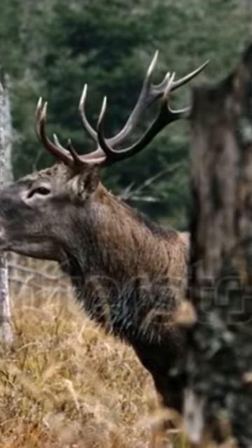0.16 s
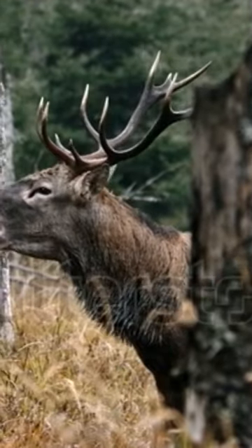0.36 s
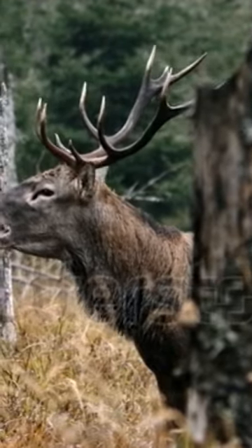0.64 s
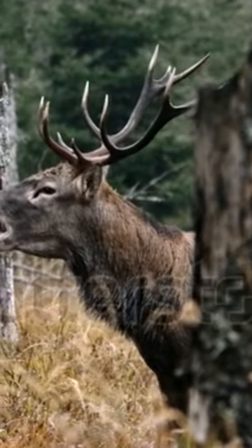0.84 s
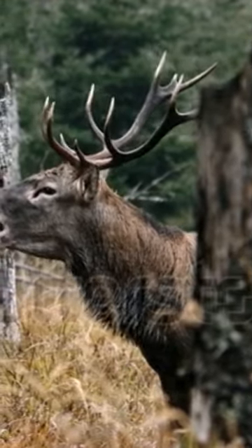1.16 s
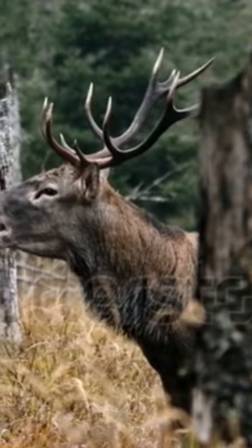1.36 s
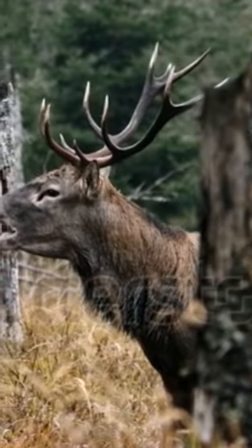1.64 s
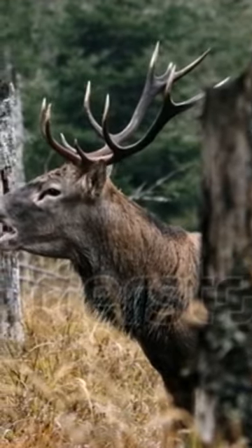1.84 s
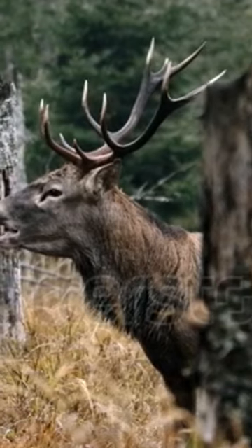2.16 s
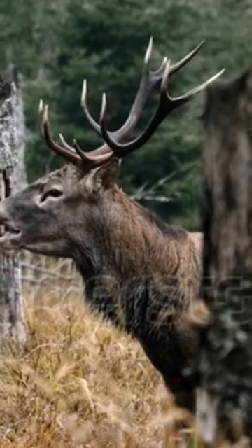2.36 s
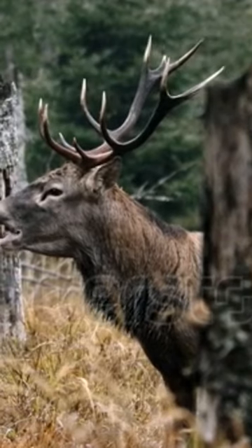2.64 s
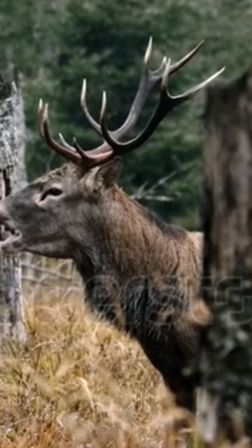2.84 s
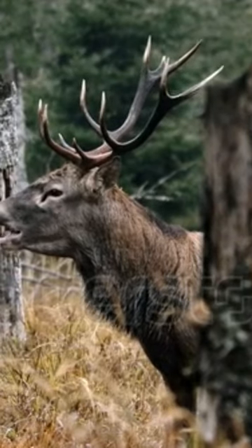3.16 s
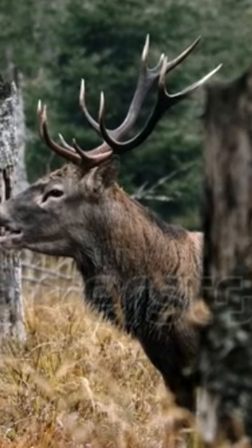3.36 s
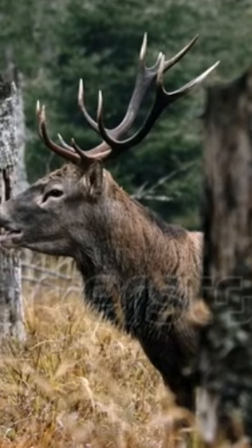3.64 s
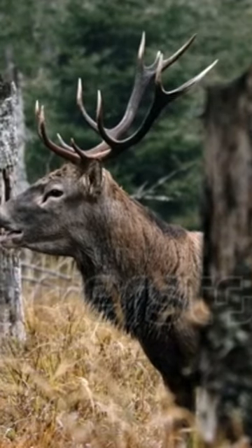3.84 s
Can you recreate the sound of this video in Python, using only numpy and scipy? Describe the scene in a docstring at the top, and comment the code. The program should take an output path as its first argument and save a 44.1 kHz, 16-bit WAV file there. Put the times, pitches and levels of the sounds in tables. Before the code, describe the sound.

Low, rattling deer roar, then a breathy puff and a short grunt over light wind.

```python
"""A red deer stag's roar, ending over a light rumble of wind in quiet woodland. Slow, separate slaps of
the vocal folds ring his long throat, which lengthens as he calls; the roar collapses into a chuff of air.
He puffs once. Two dry ticks, two soft bass bumps and a small bird's chirp follow, then his short, dry,
rattling grunt and a last chuff. Trees return a dull echo."""
import sys
import numpy as np
from scipy import signal
from scipy.fft import rfft, irfft
from scipy.io import wavfile
from scipy.ndimage import uniform_filter1d

SR = 44100
rng = np.random.default_rng(int(sys.argv[2]) if len(sys.argv) > 2 else 0)


def wav_record(signal):
    """Record a signal, one row per channel, as 16-bit PCM in the file named by sys.argv[1]."""
    frames = np.transpose(np.atleast_2d(signal))
    bounded = np.clip(frames, -1, 1)
    # unit amplitude maps onto the largest positive 16-bit level
    quanta = np.round(bounded * 32767).astype(np.int16)
    wavfile.write(sys.argv[1], SR, quanta)


N = 176400
HZ = np.fft.rfftfreq(8192, 1 / SR)

# roar, fold rate: time_s, slaps_per_s
ROAR_SLAP_RATE = [(.0126, 29.21), (.07, 31.29), (.17, 26.78), (.3, 36.09), (.41, 40.55), (.5, 41.25),
                  (.61, 25.75)]
# roar, effort: time_s, relative_db, tuning_ratio, tilt_db_per_octave
ROAR_EFFORT = [(0, -18, 1.083, 0.5), (.19, -18.5, 1.037, 1), (.35, -16.5, 1.005, -0.1), (.46, -17, .99, 1),
               (.54, -16, .972, -1), (.6, -24, .96, -3)]
# roar, throat resonances before tuning: centre_hz, width_hz, relative_db
ROAR_MODES = [(327.5, 10, -16), (441.7, 18, -3), (554, 17, 3.5), (910, 14, -4), (1060, 104, -16),
              (1267, 19, -4.5), (1502, 16, -6), (1878, 35, -5.5), (1963, 36, -6), (2294, 47, -10.5),
              (2704, 83, -12.5), (2900, 39, -11.5), (3187, 34, -11.5), (3510, 97, -19), (3970, 174, -19.5),
              (5160, 46, -25.5), (6160, 47, -37), (6950, 53, -40), (7500, 59, -36)]
# roar, nasal side-branch dips before tuning: centre_hz, width_hz, depth_db
NASAL_DIPS = [(1690, 72, 14.5), (2498, 45, 38), (4620, 147, 18)]
# roar, broad colour: freq_hz, gain_db
ROAR_EQ = [(30, -16), (160, -0.5), (400, 0.5), (4200, -3), (5500, -1), (8000, -5), (11000, -17),
           (16000, -34)]
# wind and forest hiss spectrum: freq_hz, relative_db
WIND_SPECTRUM = [(10, -19), (22, -0.5), (40, 2.5), (75, -0.5), (110, -10.5), (180, -16), (300, -14.5),
                 (420, -15.5), (620, -24.5), (800, -21), (1100, -29), (2000, -32.5), (2550, -29),
                 (3100, -36), (5000, -40), (15000, -44.5)]
# woodland reverberation: freq_hz, t60_s
WOODS_DECAY = [(100, 0.33), (500, 1.8), (1500, 1.92), (3000, 1.7), (10000, .4)]
# chuffs as the throat relaxes: start_s, length_s, level_db, first_hz, last_hz
CHUFF_SWEEPS = [(0.56, .056, -23.5, 477.7, 60), (3.429, .05, -36.5, 398.3, 69.6)]
# puffs of air: start_s, rise_s, fade_60db_s, level_db, tilt_db_per_octave
PUFF_BURSTS = [(.565, .028, .07, -26, -.5), (.612, .016, .075, -28, 0), (1.381, .004, .075, -32.5, 0),
               (1.408, .02, .1, -38, -.5), (3.434, .008, .07, -38, -3), (3.462, .016, .11, -42, -2)]
# puffs, open-mouth resonances before tuning: centre_hz, width_hz, relative_db
MOUTH_MODES = [(382, 180, 1), (698, 113, 1), (1100, 300, -4.5), (1640, 130, -3.5), (1920, 110, 1.5),
               (2110, 120, -5.5), (3570, 220, -26), (4040, 230, -29), (7660, 380, -26.5)]
# puffs, broad colour: freq_hz, gain_db
PUFF_EQ = [(30, -4), (160, 1), (2300, -3), (2700, -2.5), (3500, 0), (8000, -3), (10000, -6), (16000, -24)]
# dry ticks: start_s, relative_db, ring_hz
DRY_TICKS = [(1.754, -46.5, 1440), (2.0866, -40, 3870)]
# soft bumps: start_s, length_s, pitch_hz, level_db
BASS_BUMPS = [(2.082, 0.038, 74.5, -31.5), (2.143, .04, 48, -33)]
# bird's rising chirp: time_s, pitch_hz, level_db
BIRD_CHIRP = [(3.1, 3155, -59), (3.112, 3700, -45), (3.126, 4400, -55), (3.142, 4450, -46.5),
              (3.165, 4430, -62), (3.185, 4520, -58), (3.22, 4520, -76)]
# grunt, fold rate: time_s, slaps_per_s
GRUNT_SLAP_RATE = [(3.2447, 34.5), (3.305, 34.5), (3.35, 24.5), (3.44, 13.9)]
# grunt, effort: time_s, relative_db, tuning_ratio, tilt_db_per_octave
GRUNT_EFFORT = [(3.244, -25.5, 1, -0.5), (3.275, -23, 0.99, -1.5), (3.376, -24, 0.99, -1),
                (3.431, -23, .985, -4.5)]
# grunt, throat resonances before tuning: centre_hz, width_hz, relative_db
GRUNT_MODES = [(612, 34.5, -3), (1130, 164, -3), (1754, 95, 2.5), (2020, 46, -10), (2210, 74, -2.5),
               (2390, 12, 4), (3150, 90, -16.5), (3400, 110, -16), (4250, 400, -14.5), (5570, 300, -22),
               (6800, 400, -26), (7800, 180, -31)]
# grunt, broad colour: freq_hz, gain_db
GRUNT_EQ = [(30, -6), (400, -0.5), (620, 2), (2400, -4.5), (2650, -0.5), (3100, 4), (4500, -4), (4800, -4),
            (7000, -7), (7500, -17), (8000, -5), (8700, -10), (16000, -36)]


def amp(db):
    """Decibels to gain."""
    return 10 ** (np.asarray(db) / 20)


def unit_rms(x):
    """Scale to rms 1."""
    return x / np.sqrt(np.mean(x ** 2) + 1e-20)


def at_hz(points, hz):
    """Interpolate on a log-frequency axis."""
    points_hz, values = np.transpose(points)
    return np.interp(np.log(hz + 1), np.log(points_hz + 1), values)


def at_time(curve, t):
    """Interpolate every column at time t."""
    time_s, *columns = np.transpose(curve)
    return [np.interp(t, time_s, column) for column in columns]


def add(mix, start_s, sound):
    """Mix a sound in at start_s."""
    part = mix[max(round(start_s * SR), 0):][:len(sound)]
    part += sound[:len(part)]


def peak(hz, centre_hz, width_hz):
    """Resonance curve of height 1."""
    return 1 / (1 + (2 * (hz - centre_hz) / width_hz) ** 2)


def ring(gain):
    """Minimum-phase impulse response of a gain curve, energy 1."""
    log_gain = np.log(np.maximum(gain / gain.max(), 1e-5))
    mirrored = np.r_[log_gain, log_gain[-2:0:-1]]
    response = np.fft.ifft(np.exp(np.conj(signal.hilbert(mirrored)))).real[:len(gain)]
    return response / np.linalg.norm(response)


def tract(modes, eq, tuning, tilt_db, dips=(), steady_hz=3540):
    """Vocal tract ring. A longer throat (lower tuning) lowers resonances, mainly below steady_hz."""
    hz = HZ / tuning ** (1 / (1 + (HZ / steady_hz) ** 4))
    peaks = np.sqrt(sum(amp(db) ** 2 * peak(hz, centre, width) for centre, width, db in modes))
    dips_db = sum(db * np.exp(-((hz - centre) / width) ** 2) for centre, width, db in dips)
    treble_octaves = np.log2(1 + (HZ / 1200) ** 2) / 2
    return ring(peaks * amp(at_hz(eq, hz) - dips_db + tilt_db * treble_octaves))


def disperse(x, smear_s_per_hz, delay_s):
    """Delay a slap, treble more than bass, and fade its ring."""
    size = 2 * len(HZ)
    hz = np.fft.rfftfreq(size, 1 / SR)
    phase = 2 * np.pi * hz * (delay_s + smear_s_per_hz * hz / 2)
    fade = np.minimum(np.linspace(2, 0, size), 1) ** 2
    return irfft(rfft(x, size) * np.exp(-1j * phase)) * fade


def slap_times(rate):
    """One fold slap per whole cycle of the rate curve."""
    t = np.arange(rate[0][0], rate[-1][0], 1 / SR)
    cycles = np.cumsum(at_time(rate, t)[0]) / SR
    return np.interp(np.arange(int(cycles[-1]) + 1), cycles, t)


def fold_slaps(rate, effort, modes, eq, gain_db, rasp_db, rasp_decay_s, highpass_hz,
               reflection_s, reflection_db, smear_s_per_hz, lead_s, dips=(), pad_s=0.003):
    """Each slap, with a thin reflection just after it and a short rasp of escaping air, rings the throat."""
    out, t = np.zeros(N), np.arange(2048) / SR
    highpass = signal.butter(1, highpass_hz, "high", fs=SR)
    reflection = signal.lfilter(*highpass, np.sinc((t - reflection_s) * SR))
    slap = signal.unit_impulse(len(t)) + amp(reflection_db) * reflection
    rasp_envelope = np.exp(-t / rasp_decay_s) * (1 - np.exp(-t / 0.00033))
    for start_s in slap_times(rate):
        db, tuning, tilt_db = at_time(effort, start_s)
        rasp = signal.lfilter(*highpass, rng.standard_normal(len(t))) * rasp_envelope
        drive = slap + amp(rasp_db) * rasp / np.linalg.norm(rasp)
        voice = signal.fftconvolve(drive, tract(modes, eq, tuning, tilt_db, dips))
        add(out, start_s - lead_s - pad_s, -amp(db + gain_db) * disperse(voice, smear_s_per_hz, pad_s))
    return out


def roar():
    """Slow fold slaps ring a lengthening throat; the nasal branch cuts dips."""
    return fold_slaps(ROAR_SLAP_RATE, ROAR_EFFORT, ROAR_MODES, ROAR_EQ, dips=NASAL_DIPS,
                      gain_db=26, rasp_db=4, rasp_decay_s=0.0097, highpass_hz=4300,
                      reflection_s=0.002095, reflection_db=1.5, smear_s_per_hz=1.6e-7, lead_s=0.0002)


def wind(level_db=-44, gust_db=0.8, crossover_hz=180):
    """Lumpy wind rumble under a faint, steady forest hiss."""
    hz = np.fft.rfftfreq(N, 1 / SR)
    spectrum = rfft(rng.standard_normal(N)) * amp(at_hz(WIND_SPECTRUM, hz))
    lowpass = 1 / (1 + (hz / crossover_hz) ** 4)
    gusts = unit_rms(irfft(rfft(rng.standard_normal(N)) * np.exp(-(hz / 8) ** 2), N))
    rumble = irfft(spectrum * lowpass, N) * amp(gust_db * gusts)
    hiss = irfft(spectrum * (1 - lowpass), N)
    return amp(level_db) * unit_rms(rumble + hiss)


def woods(x, near_db=-17, tail_db=-24, tail_hz=2600, echo_s=0.083, echo_db=-15.5, echo_hz=734):
    """Near trunks scatter, the tree line returns one dull echo, a faint tail follows."""
    t = np.arange(SR) / SR
    near = rng.standard_normal(SR) * np.exp(-t / 0.018) * (t > 0.002)
    hz, frame_s, bands = signal.stft(rng.standard_normal(SR), SR, nperseg=256)
    bands = bands * np.exp(-np.log(1000) * frame_s / at_hz(WOODS_DECAY, hz)[:, None])
    bands /= (1 + (hz / tail_hz) ** 2)[:, None]
    tail = signal.istft(bands, SR, nperseg=256)[1][:SR] * np.minimum(t / 0.03, 1)
    tail *= np.sqrt(np.pi * tail_hz / SR) / np.linalg.norm(tail)  # energy scales with bandwidth
    response = amp(near_db) * near / np.linalg.norm(near) + amp(tail_db) * tail
    out = x + signal.fftconvolve(x, response)[:N]
    add(out, echo_s, amp(echo_db) * signal.lfilter(*signal.butter(2, echo_hz, fs=SR), x))
    return out


def chuffs(roughness_hz=90, highpass_hz=95):
    """A rough low resonance sinks as each call is let go."""
    out = np.zeros(N)
    lowpass = signal.butter(2, roughness_hz, fs=SR, output="sos")
    for start_s, length_s, db, first_hz, last_hz in CHUFF_SWEEPS:
        progress = np.linspace(0, 1, int(length_s * SR))
        noise = rng.standard_normal((2, SR // 4))
        roughness = signal.sosfilt(lowpass, noise[0] + 1j * noise[1])[-len(progress):]
        sweep = np.exp(2j * np.pi * np.cumsum(first_hz + (last_hz - first_hz) * progress) / SR)
        chuff = (roughness * sweep).real * np.sin(np.pi * progress)
        add(out, start_s, amp(db) * unit_rms(chuff) / np.sqrt(2))
    return signal.sosfilt(signal.butter(2, highpass_hz, "high", fs=SR, output="sos"), out)


def puffs(tuning=0.97):
    """The stag blows air through his open mouth."""
    out, t = np.zeros(N), np.arange(SR // 3) / SR
    for start_s, rise_s, fade_s, db, tilt_db in PUFF_BURSTS:
        fade = np.exp(-np.log(1000) * (np.maximum(t - rise_s, 0) / fade_s) ** 2)
        breath = rng.standard_normal(len(t)) * np.minimum(t / rise_s, 1) * fade
        mouth = tract(MOUTH_MODES, PUFF_EQ, tuning, tilt_db)
        add(out, start_s, amp(db) * signal.fftconvolve(breath, mouth))
    return out


def ticks(width_hz=900, body_hz=1950, body_db=-2, treble_db=-20.5, gain_db=22):
    """Dry clicks: a quickly damped ring over a woody body."""
    out = np.zeros(N)
    body = amp(body_db) * peak(HZ, body_hz, width_hz)
    for start_s, db, ring_hz in DRY_TICKS:
        treble = amp(treble_db) * np.exp(-((HZ - 2.5 * ring_hz) / ring_hz) ** 2)
        add(out, start_s, amp(db + gain_db) * ring(peak(HZ, ring_hz, width_hz) + body + treble))
    return out


def bumps():
    """A few dull cycles of bass swell and die."""
    out = np.zeros(N)
    for start_s, length_s, hz, db in BASS_BUMPS:
        t = np.arange(0, length_s, 1 / SR)
        add(out, start_s, amp(db) * np.sin(np.pi * t / length_s) * np.sin(2 * np.pi * hz * t))
    return out


def bird(waver_ratio=0.024, hiss_db=-58, hiss_width_s=0.049):
    """A thin, wavering whistle slides up out of a faint hiss and holds."""
    out, t = np.zeros(N), np.arange(BIRD_CHIRP[0][0], BIRD_CHIRP[-1][0], 1 / SR)
    hz, db = at_time(BIRD_CHIRP, t)
    waver = unit_rms(uniform_filter1d(rng.standard_normal(N), size=40))[:len(t)]
    phase = 2 * np.pi * np.cumsum(hz * (1 + waver_ratio * waver)) / SR
    add(out, t[0], np.sqrt(2) * amp(db) * np.sin(phase))
    bandpass = signal.butter(2, (3200, 5000), "band", fs=SR, output="sos")
    hiss = unit_rms(signal.sosfilt(bandpass, rng.standard_normal(N)))
    swell = np.exp(-((np.arange(N) / SR - t[0]) / hiss_width_s) ** 2)
    return out + amp(hiss_db) * hiss * swell


def grunt():
    """A few slowing fold slaps rattle a more damped throat."""
    return fold_slaps(GRUNT_SLAP_RATE, GRUNT_EFFORT, GRUNT_MODES, GRUNT_EQ,
                      gain_db=25.5, rasp_db=-3.5, rasp_decay_s=0.012, highpass_hz=4000,
                      reflection_s=0.0032, reflection_db=-5, smear_s_per_hz=2.2e-7, lead_s=0.0001)


def scene():
    """Stag, ticks and bird among the trees; bumps and wind without echo. Mono."""
    stag = roar() + grunt() + puffs() + chuffs()
    return (woods(stag + ticks() + bird()) + bumps() + wind())[None]


def record(dry):
    """Low-pass at 15.75 kHz."""
    lowpass = signal.firwin(511, 15750, window=("kaiser", 9), fs=SR)
    return signal.oaconvolve(dry, lowpass[None], "same")


dry = scene()
out = record(dry)
wav_record(out)
```